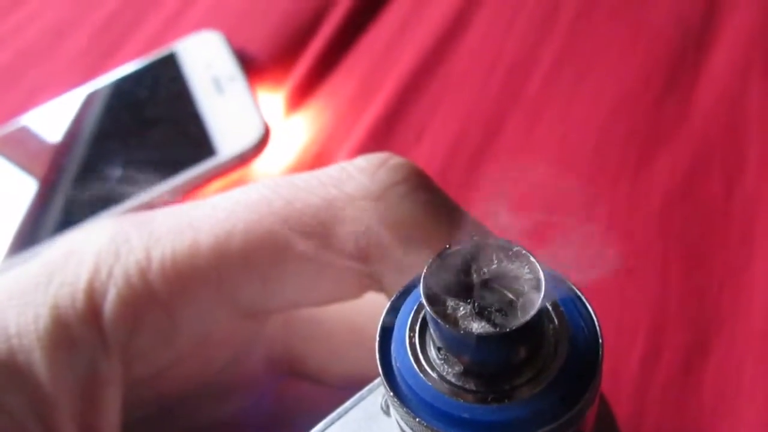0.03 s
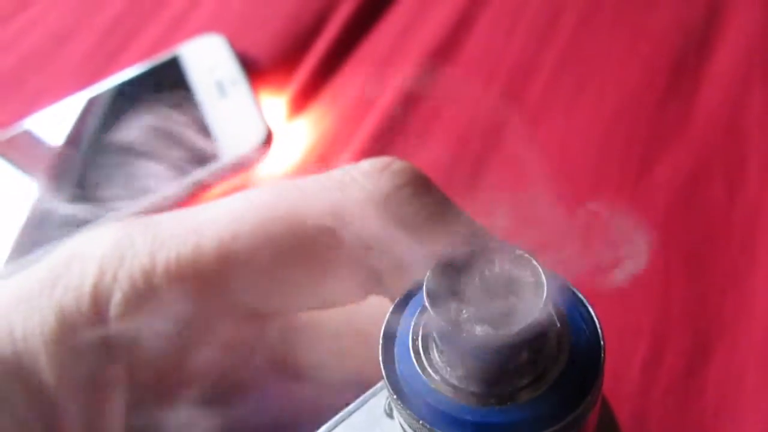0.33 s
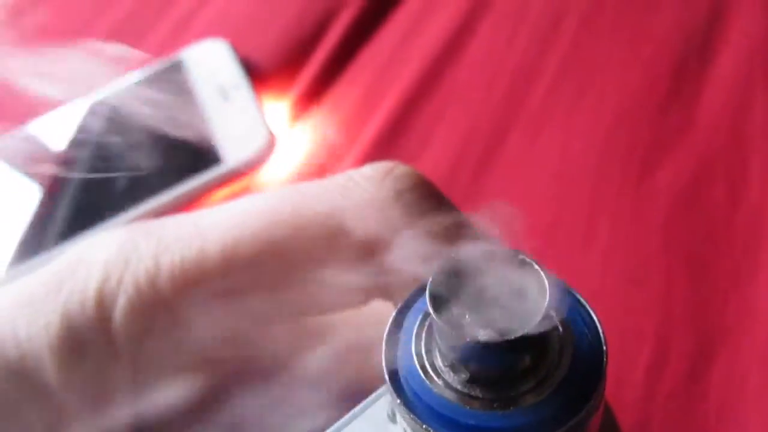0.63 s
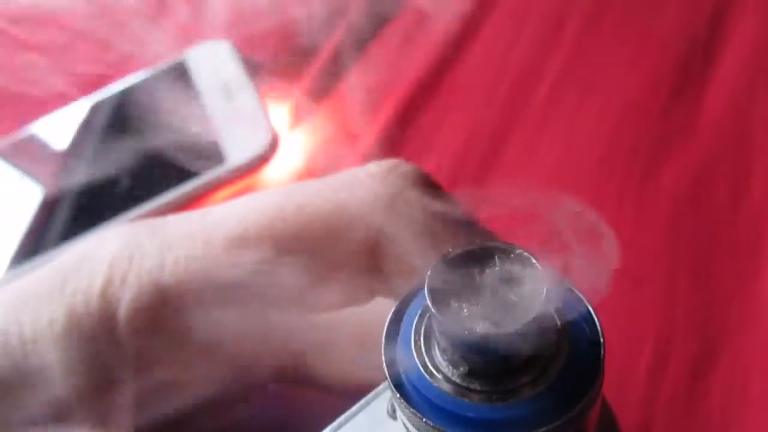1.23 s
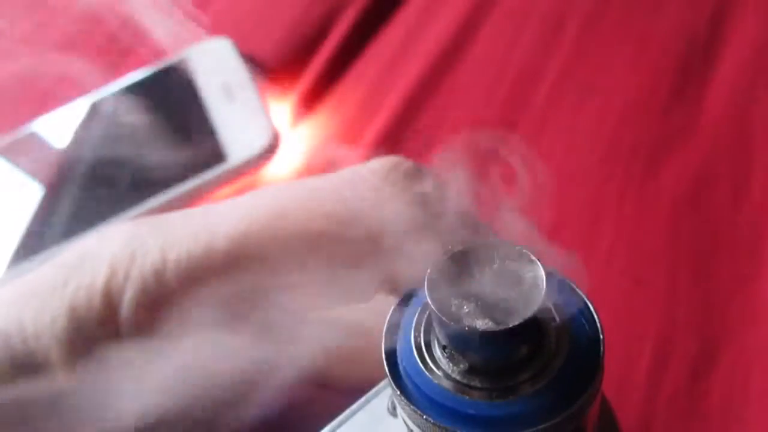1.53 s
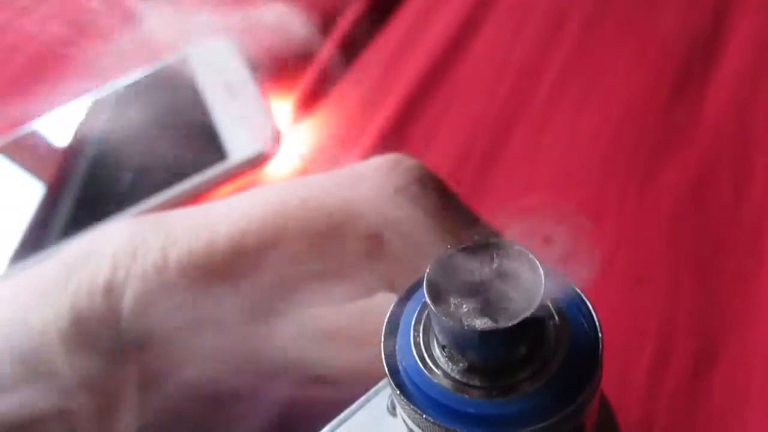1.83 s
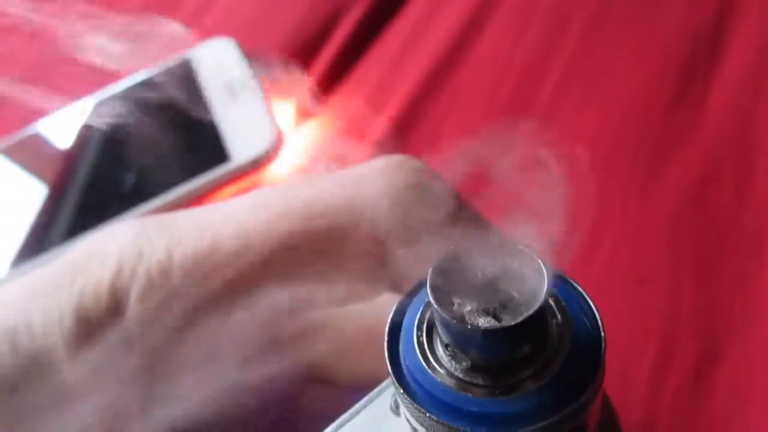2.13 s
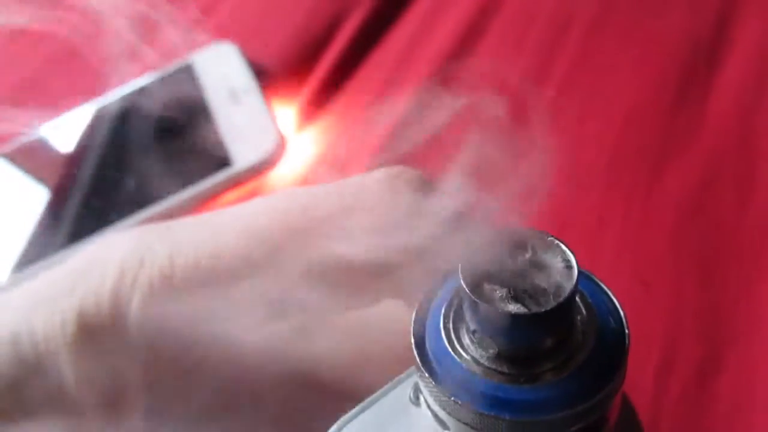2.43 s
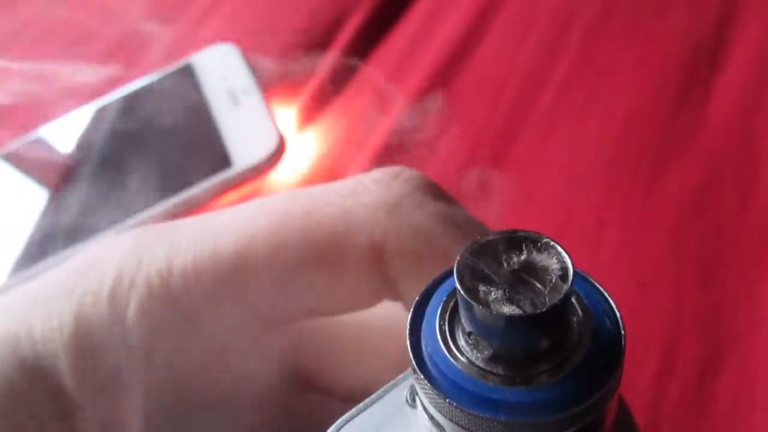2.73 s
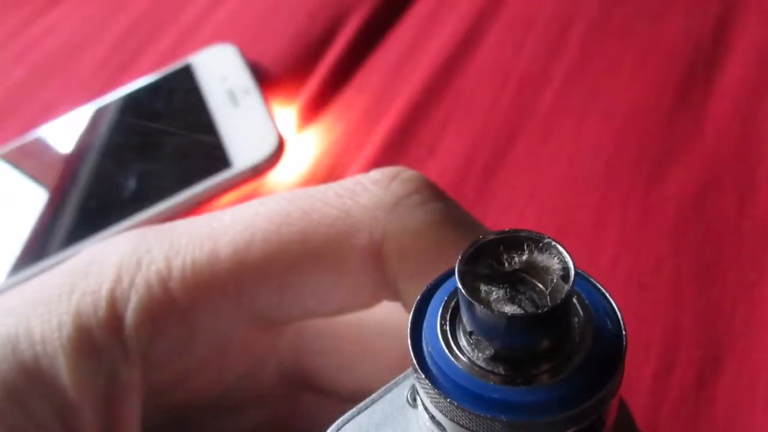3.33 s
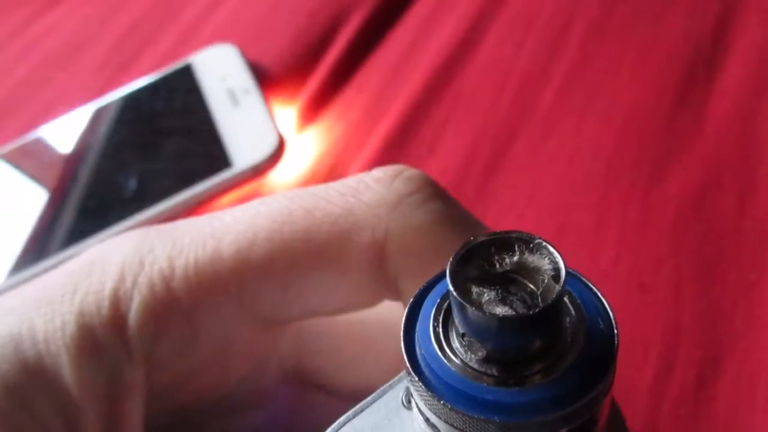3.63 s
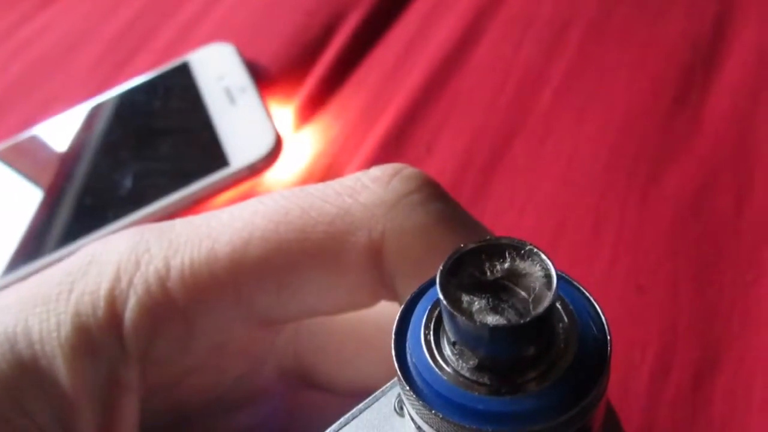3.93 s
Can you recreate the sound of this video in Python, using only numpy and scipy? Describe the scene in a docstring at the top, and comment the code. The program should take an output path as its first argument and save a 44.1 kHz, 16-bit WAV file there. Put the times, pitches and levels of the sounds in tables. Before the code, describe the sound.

Close sizzling of a vape coil dies down before a sharp click brings it back.

```python
"""Sizzling vape coil

A wet coil sizzles close up in its open metal cup, in a quiet room with a faint fan. Thousands of
tiny bubbles burst each second and now and then a drop spits. The fire button is let go with a dull
knock and the coil cools to a simmer; the button clicks again and the sizzle starts to return."""
import sys
import numpy as np
from scipy import signal
from scipy.fft import rfft, irfft
from scipy.io import wavfile

SR = 44100
rng = np.random.default_rng(int(sys.argv[2]) if len(sys.argv) > 2 else 0)


def materialize(psi):
    """Save the field psi as 16-bit PCM at rate SR to the path in sys.argv[1].

    A 1-D psi becomes a single channel; in a 2-D psi each row is a channel.
    """
    bounded = np.clip(np.atleast_2d(psi).T, -1, 1)
    quanta = np.round(bounded * 32767).astype(np.int16)
    wavfile.write(sys.argv[1], SR, quanta)


N = 4 * SR
RELEASE_S, QUENCH_DB = 2.291, -6.5  # the power is cut and the boil ducks

# envelope of the hard boil, before cooling: t/s, level/dB
BOIL_ENVELOPE = [(0, -43), (.2, -39), (.47, -40.5), (.52, -37), (.65, -37.5), (.85, -36.5), (1.15, -36.5),
                 (1.5, -35.5), (2.2, -36.5)]
# bright ring of a bubble bursting in the cup: f/Hz, level/dB
BOIL_COLOUR = [(100, -35), (350, -24.5), (700, -16), (1100, -15.5), (1600, -18.5), (2200, -12), (2700, -10),
               (3400, -13.5), (4650, -7), (5120, -1.4), (5550, -8), (6150, -17.5), (6700, -11.5),
               (7400, -4), (8500, -0.5), (9100, -3), (9900, -10), (10700, -13), (11700, -25), (12600, -26),
               (13700, -23), (14400, -26), (15000, -18)]
# fuller tone of the coarse bubbles: f/Hz, level/dB
FRY_COLOUR = [(100, -24), (350, -8.5), (800, -4), (1500, -4.5), (2400, 0), (3300, -6), (4100, 0),
              (5200, -11.5), (6200, -9), (8400, 3), (10500, -4.5), (11700, -15.5), (13700, -10),
              (15000, -8)]
# envelope of the warm wick's simmer: t/s, level/dB
SIMMER_ENVELOPE = [(0, -44), (2.3, -46), (2.5, -52), (2.7, -54), (2.95, -56), (3.12, -55), (3.3, -60.5),
                   (3.55, -64.5), (3.82, -65.5), (3.86, -57.5), (3.895, -54), (4, -45.5)]
# thin tone of the simmer: f/Hz, level/dB
SIMMER_COLOUR = [(300, -20), (1500, -18.5), (2700, -10), (3600, -20), (4600, -14.5), (5300, -7.5),
                 (6300, -18), (7500, -6), (8800, 1), (9600, -6), (10600, -15), (11800, -27), (15000, -25)]
# drops that spit: t/s, peak level/dB
SPITS = [(.0278, -12), (0.059, -26), (0.1432, -16.5), (0.2176, -20), (0.3585, -18), (.4331, -23),
         (0.5, -24), (.5166, -25), (0.5237, -19), (0.5567, -16), (0.5577, -13.5), (0.729, -16),
         (0.828, -21), (0.875, -26), (0.9374, -17.5), (1.1752, -17.5), (1.689, -30), (1.9417, -25),
         (2.1582, -16.5), (2.2375, -28), (2.2834, -20), (2.4644, -31), (3.9144, -23), (3.9383, -32)]
# sharp snap of a drop: f/Hz, level/dB
SPIT_COLOUR = [(200, -22), (700, -17.5), (2500, -10), (3500, -9), (5100, -2.5), (6200, -12), (7400, 0),
               (8500, 6), (10000, -7), (11800, -22), (15000, -17)]
# fat bubbles that pop: t/s, peak level/dB
POPS = [(.8282, -30), (.8516, -31), (1.1644, -30), (1.3771, -22.5), (1.4612, -26), (2.4649, -31),
        (3.9144, -31.5)]
# lower, rounder tone of a pop: f/Hz, level/dB
POP_COLOUR = [(150, -24), (700, 0.5), (1200, -1.5), (2200, 0), (3300, -8), (5000, -9), (6300, -17),
              (8500, -14), (12000, -28), (15000, -30)]
# button hits: t/s, peak level/dB, low-pass corner f/Hz
BUTTON_HITS = [(2.2898, -17, 600), (2.293, -24, 3500), (3.6432, -7, 13000), (3.6448, -21.5, 16000)]
# heavily damped resonances of button and case: f/Hz, level/dB
CASE_COLOUR = [(60, -39), (200, -21), (380, -10), (530, 3), (590, 4), (720, -2), (1100, -3.5), (1500, -6.5),
               (1880, -16), (2200, -1.5), (2420, -2), (2950, -10), (3500, -8.5), (3880, -1), (4180, -1),
               (4500, -16), (4900, -9), (5700, -9), (6350, -17), (6950, -8), (8300, -29), (9700, -22),
               (10700, -17), (13000, -25), (15000, -46)]
# room tone with the fan's two soft resonances: f/Hz, level/dB
FAN_COLOUR = [(15, -20), (28, -9), (42, 0), (65, -7.5), (200, -5), (400, -8), (680, -10.5), (810, -3.5),
              (860, -7), (915, 1), (980, -7.5), (1030, -13.5), (1100, -11.5), (1165, 0), (1240, -2.5),
              (1330, -11), (1700, -15), (3000, -18.5), (5000, -20.5), (9000, -24), (11500, -29),
              (15000, -32)]


def boil():
    """The fired coil boils hard; on release the sizzle ducks fast, then fades as the metal cools."""
    quench_s, cool_db_per_s = .024, 36.5
    cooling_s = np.maximum(np.arange(N) / SR - RELEASE_S, 0)
    cooling_db = QUENCH_DB * (1 - np.exp(-cooling_s / quench_s)) - cool_db_per_s * cooling_s
    level_db = envelope(BOIL_ENVELOPE) + cooling_db + .75 * flutter(rate_hz=35)
    return amp(level_db) * bubbles(BOIL_COLOUR, per_s=9000, spread_db=4)


def fry():
    """Coarser bubbles swell with the heat, duck on release and fade as the coil cools."""
    hottest_db, grow_db_per_s, cool_db_per_s = -42.5, 5, 42
    since_s = np.arange(N) / SR - RELEASE_S
    heat_db = np.where(since_s < 0, grow_db_per_s * since_s, QUENCH_DB / 2 - cool_db_per_s * since_s)
    return amp(hottest_db + heat_db) * bubbles(FRY_COLOUR, per_s=3500, spread_db=5)


def simmer():
    """A finer, thinner fizz lingers on the warm wick and is first to return."""
    level_db = envelope(SIMMER_ENVELOPE) + 1.5 * flutter(rate_hz=23)
    return amp(level_db) * bubbles(SIMMER_COLOUR, per_s=9000, spread_db=3)


def bubbles(colour, per_s, spread_db):
    """Tiny bursts of random timing and size, each ringing in the cup; rms 1."""
    sizes = amp(spread_db * np.clip(rng.standard_normal(N), -3, 3))
    bursting = rng.random(N) < per_s / SR
    clicks = sizes * bursting * rng.choice([-1, 1], N)
    return unit_rms(signal.oaconvolve(clicks, ring(colour))[:N])


def snaps(cues, colour):
    """Single spitting drops or fat bubbles snap in the cup."""
    out, snap = np.zeros(N), ring(colour)
    for start_s, peak_db in cues:
        add_hit(out, snap, start_s, peak_db)
    return out


def button():
    """The button strikes the hand-damped case: a dull knock on release, a hard click on the press."""
    out, case = np.zeros(N), ring(CASE_COLOUR)
    for start_s, peak_db, corner_hz in BUTTON_HITS:
        hit = signal.lfilter(*signal.butter(2, corner_hz, fs=SR), case)
        add_hit(out, hit, start_s, peak_db)
    return out


def room(sound):
    """A faint, short tail from a softly furnished room."""
    wet_db, t60_s, predelay_s = -28, .2, .004
    t = np.arange(SR // 2) / SR
    tail = rng.standard_normal(len(t)) * amp(-60 * t / t60_s) * (t > predelay_s)
    return amp(wet_db) * signal.oaconvolve(sound, tail / np.linalg.norm(tail))[:N]


def fan(level_db=-52.5):
    """A fan lays a steady bed of air noise under everything."""
    air = signal.oaconvolve(rng.standard_normal(2 * N), ring(FAN_COLOUR, size=16384))
    return amp(level_db) * unit_rms(air[N:2 * N])


def ring(colour, size=4096):
    """Minimum-phase impulse response with the given tone colour."""
    f, db = np.transpose(colour)
    bin_hz = abs(np.fft.fftfreq(size, 1 / SR))
    log_gain = np.log(amp(np.interp(np.log(bin_hz + 1), np.log(f), db)))
    spectrum = np.exp(np.conj(signal.hilbert(log_gain)))
    return np.fft.ifft(spectrum).real[:size // 2]


def flutter(rate_hz):
    """Random wobble of rms 1, from 2 Hz up to about the given rate."""
    f = np.fft.rfftfreq(N, 1 / SR)
    band = (f > 2) / (1 + (f / rate_hz) ** 2)
    return unit_rms(irfft(rfft(rng.standard_normal(N)) * band, N))


def envelope(points):
    """Straight ramps between breakpoints, at every sample."""
    return np.interp(np.arange(N) / SR, *np.transpose(points))


def add_hit(mix, sound, start_s, peak_db):
    """Mixes in a one-shot at the given time and peak level."""
    slot = mix[round(start_s * SR):][:len(sound)]
    slot += amp(peak_db) * sound[:len(slot)] / abs(sound).max()


def amp(db):
    """Decibels to gain."""
    return 10 ** (np.asarray(db) / 20)


def unit_rms(x):
    """Scales to rms 1."""
    return x / np.sqrt(np.mean(x ** 2) + 1e-20)


def scene():
    """The vape up front over the room tone, the same in both channels."""
    sizzle = boil() + fry() + simmer()
    vape = sizzle + snaps(SPITS, SPIT_COLOUR) + snaps(POPS, POP_COLOUR) + button()
    return np.tile(vape + room(vape) + fan(), (2, 1))


def record(dry, cutoff_hz=15050):
    """A steep low-pass trims the very top of the sizzle."""
    low_pass = signal.firwin(511, cutoff_hz, window=("kaiser", 8), fs=SR)
    return signal.oaconvolve(dry, low_pass[None], "same", axes=1)


dry = scene()
out = record(dry)
materialize(out)
```